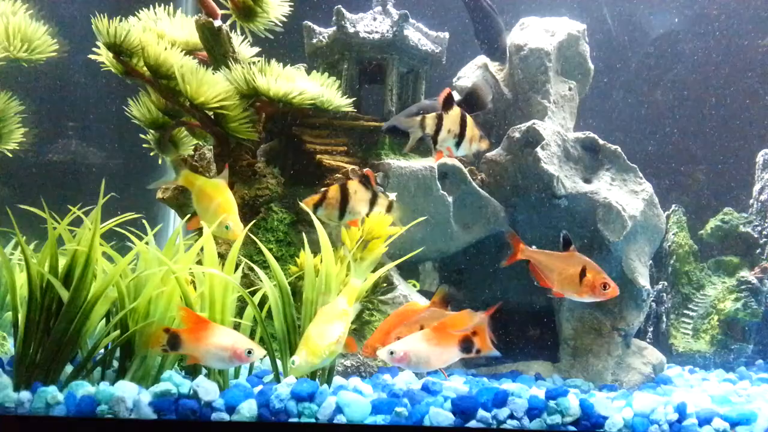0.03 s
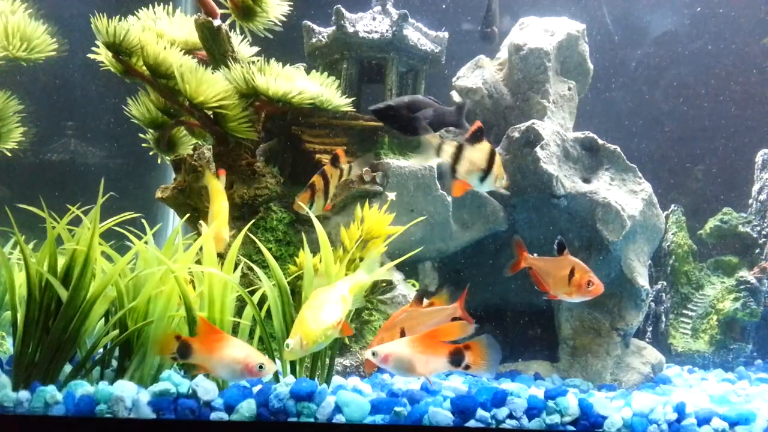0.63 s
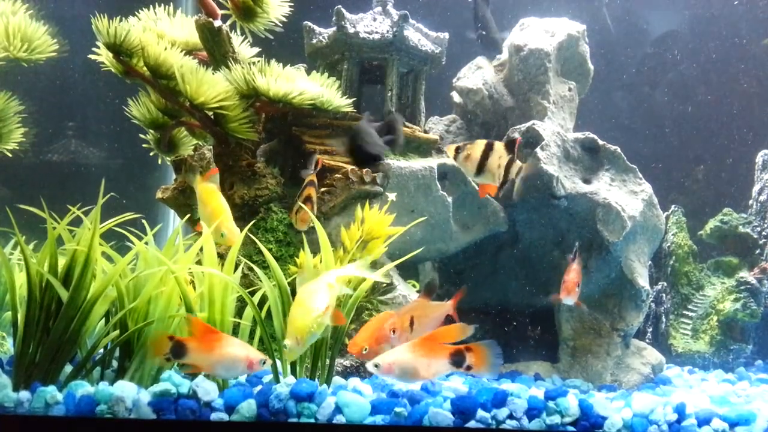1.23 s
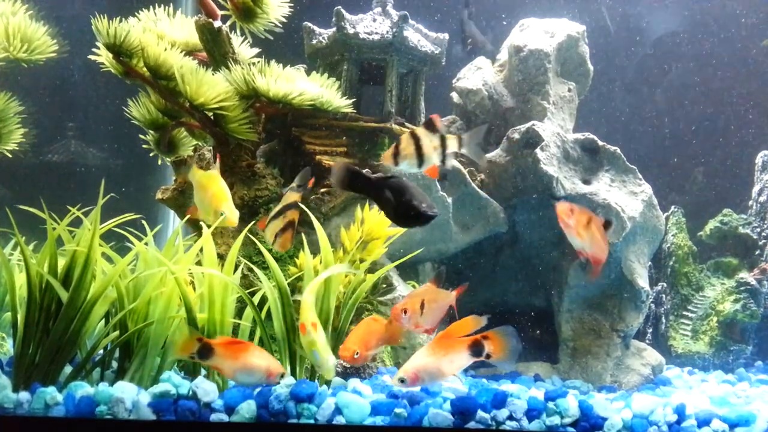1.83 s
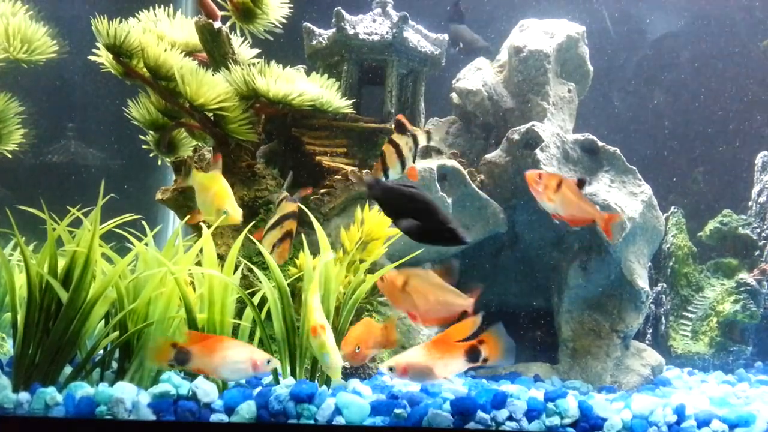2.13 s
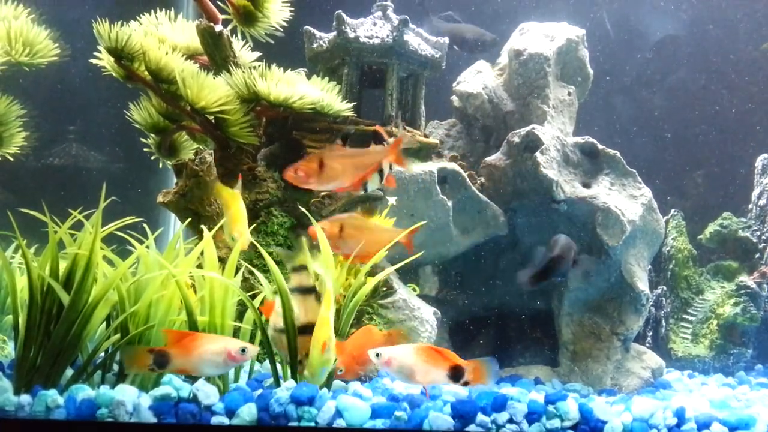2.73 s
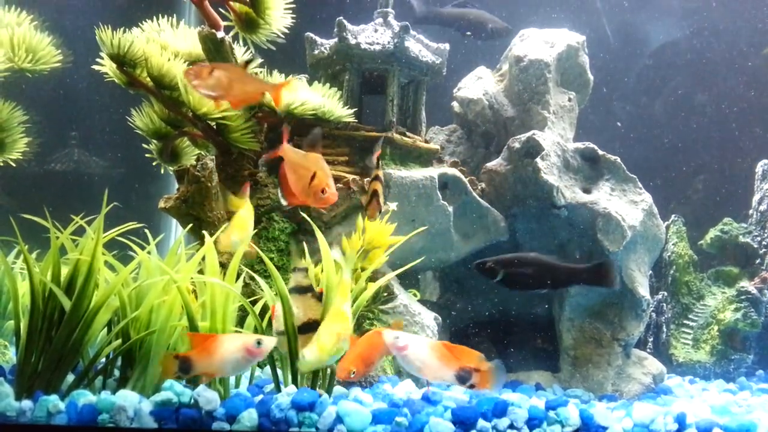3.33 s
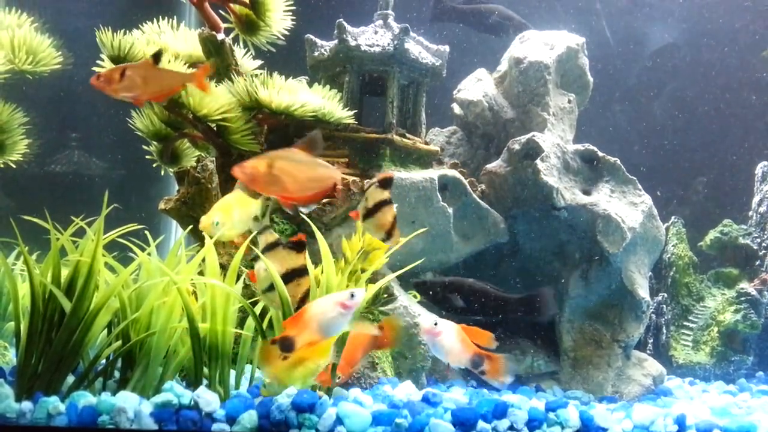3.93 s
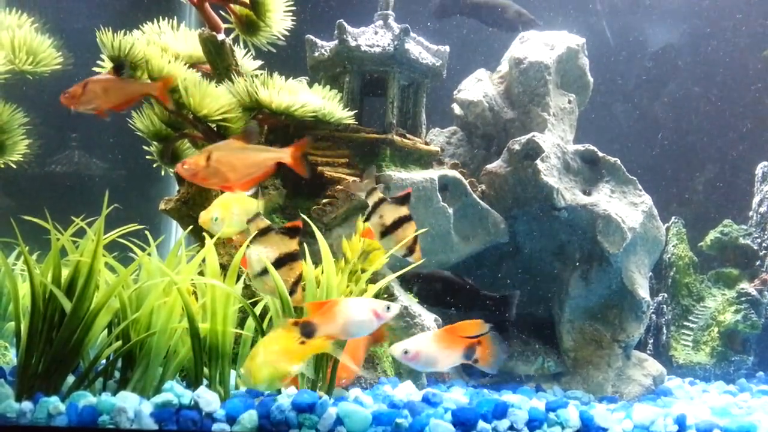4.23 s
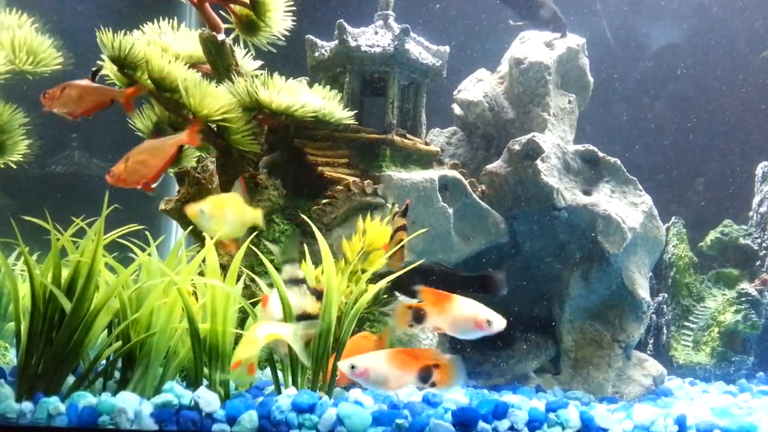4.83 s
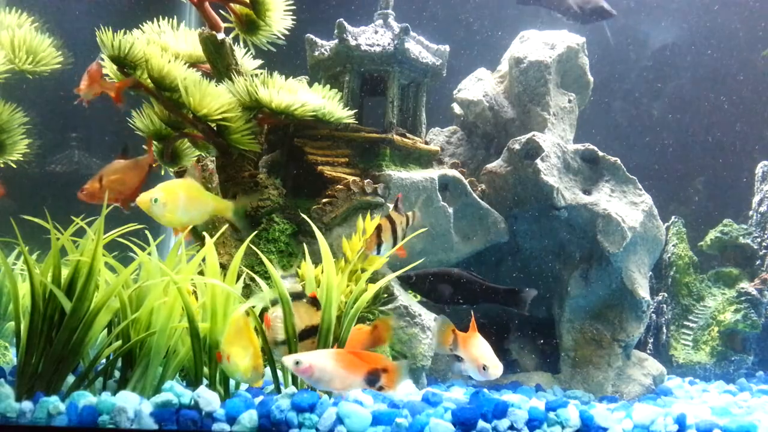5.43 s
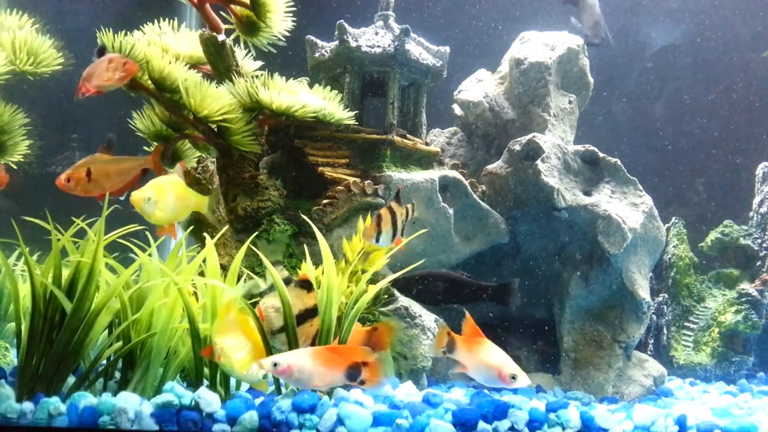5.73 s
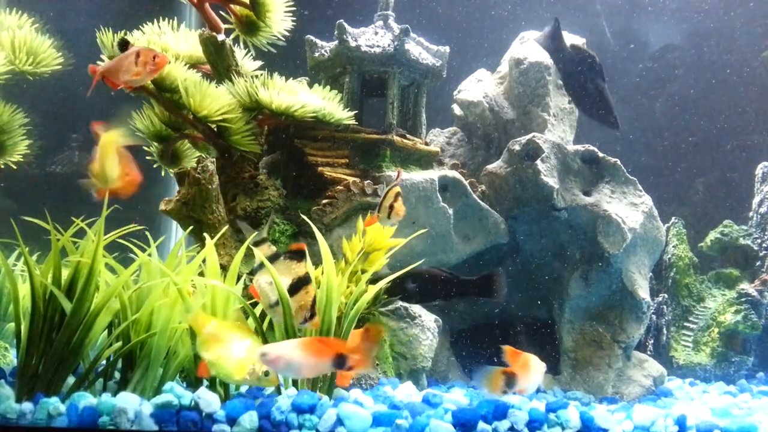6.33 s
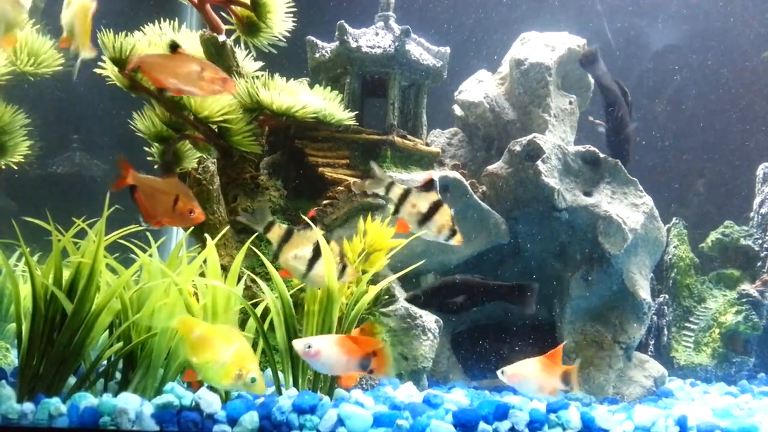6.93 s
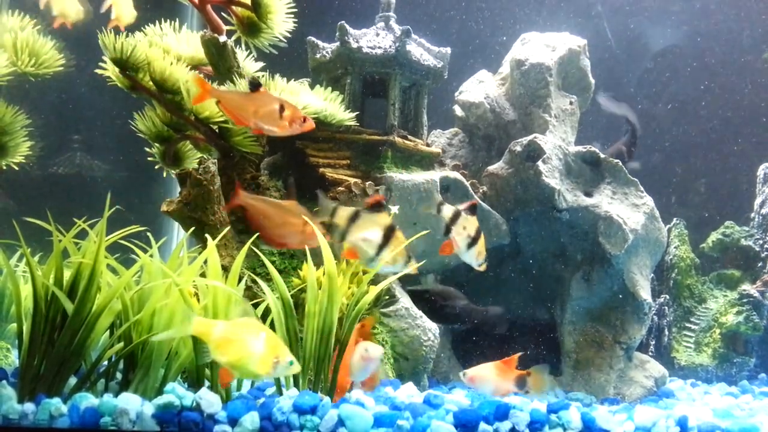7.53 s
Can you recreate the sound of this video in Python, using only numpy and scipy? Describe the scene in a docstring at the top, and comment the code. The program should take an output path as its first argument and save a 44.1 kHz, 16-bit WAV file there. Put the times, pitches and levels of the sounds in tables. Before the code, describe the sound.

Aquarium filter water bubbling and gurgling steadily, with occasional low gulps over a soft pump hum and faint hiss.

```python
"""A gulp of air and gurgling water, after 0.8 s of silence: an aquarium filter in a quiet room.
Large bubbles ring at the outflow, heard from just outside the glass, over froth and a low churn.
Now and then the outflow gulps again and the water column rings. The surface fizzes and splashes
softly; tiny bubbles tick as they burst. The mains-driven pump hums, and a faint hiss lies under it all."""
import sys
import numpy as np
from scipy import signal
from scipy.fft import rfft, irfft, next_fast_len
from scipy.io import wavfile

SR = 44100
rng = np.random.default_rng(int(sys.argv[2]) if len(sys.argv) > 2 else 0)


def unload_wav(signal):
    """Save mono or channel-first audio to the path in sys.argv[1] as 16-bit WAV at rate SR, clipped to [-1, 1]."""
    wavfile.write(
        sys.argv[1],
        SR,
        np.round(np.clip(np.atleast_2d(signal).T, -1, 1) * 32767).astype(np.int16),
    )


N = 338247
LEFT_LEAD_MS = 0.31  # the outflow is nearer the left ear

# left-right likeness of noise and room tail: f/Hz, coherence/1
COHERENCE = [(30, 0.71), (130, 0.97), (300, 0.99), (630, 0.88), (1000, 1), (1400, 0), (15000, 0)]
# room decay: f/Hz, t60/s
ROOM_DECAY = [(100, 0.91), (500, 0.19), (2000, 0.067), (12000, 0.07)]
# hiss spectrum: f/Hz, relative density/dB
HISS_SPECTRUM = [(100, -4.5), (2000, 0.5), (4000, 0), (6200, -5), (8000, -0.75), (10000, 0), (15000, -1)]
# pump hum: mains multiple/1, left rms/dB, right rms/dB, left lead/rad
PUMP_HARMONICS = [(1, -72, -68, 1.2), (2, -55, -55.5, 0.2), (3, -56, -61.5, 0.5), (4, -64.5, -63.5, 0.5),
                  (5, -61.5, -67.5, 1.64), (7, -81, -78, -1.8), (8, -61.5, -65.5, -0.04),
                  (12, -75.5, -83, -0.5), (17, -85, -75, 0.5), (18, -96, -75, 4.5), (19, -67, -68.5, -0.86)]
# hollow resonances of the air under the lid: f/Hz, width/Hz, relative level/dB
LID_MODES = [(85, 7.7, -4), (931, 17.4, 4)]
# outflow strength: t/s, level/dB
FLOW_CURVE = [(.82, 1), (1.25, -5), (1.6, 1.5), (2.6, 0), (3.1, 1), (3.55, -2), (4.35, 0), (4.7, 3),
              (5.25, -3), (5.9, 2), (6.5, 0.5), (6.87, 1), (7.2, 0.5), (7.66, -2)]
# surface fizz spectrum: f/Hz, relative density/dB
FIZZ_SPECTRUM = [(300, -5.5), (800, 1), (1150, 8.5), (1450, -1), (2200, -2.5), (3800, -6.5), (6000, -12),
                 (15000, -39)]
# soft surface splashes: t/s, length/s, level/dB
SURFACE_SPLASHES = [(.81, 0.055, -56), (2.72, .15, -64), (4.57, 0.19, -62), (4.83, 0.12, -59),
                    (5.48, 0.11, -61), (6.86, 0.093, -58.5)]
# tiny bubbles bursting: t/s, level/dB, f/Hz
SURFACE_TICKS = [(.874, -55, 6940), (1.562, -54, 13100), (1.742, -57, 8800), (2.388, -50.5, 2120),
                 (2.552, -56.5, 4070), (3.217, -57, 7150), (3.937, -58, 5770), (3.971, -58.5, 4070),
                 (4.593, -51, 3550), (4.746, -55, 9400), (5.102, -57, 3960), (5.106, -58, 7550),
                 (5.309, -55.5, 10300), (5.502, -55, 2500), (6.148, -57, 2160), (7.009, -58, 2600)]
# churning water spectrum: f/Hz, relative density/dB
CHURN_SPECTRUM = [(25, -52), (55, -41), (75, -31), (100, -17), (125, -3), (170, 0), (215, -11.5), (285, -6),
                  (355, -11.5), (470, -15), (670, -21.5), (770, -19.5), (1500, -34.5), (5000, -61)]
# froth spectrum: f/Hz, relative density/dB
FROTH_SPECTRUM = [(40, -60), (150, -22), (340, -20.5), (400, 2), (480, 0), (550, -2.5), (610, -11),
                  (680, -2.5), (770, -20), (1500, -26.5), (5000, -54)]
# spurts of small bubbles: t/s, length/s, level/dB
FROTH_SPURTS = [(.865, 0.066, -50), (1.335, 0.078, -45.5), (1.9, 0.1, -53.5), (2.28, 0.037, -41.5),
                (2.98, 0.049, -55), (3.425, 0.062, -48.5), (4.4, 0.045, -51), (4.485, 0.096, -47),
                (4.565, 0.13, -46), (5.37, 0.049, -45.5), (6.05, 0.1, -45), (7.61, 0.1, -51)]
# air gulps: t/s, level/dB, then the pocket's level/dB, f/Hz, length/s, rise/(octaves per s)
AIR_GULPS = [(.82, -44.5, -51, 285.6, 0.069, 2.1), (2.86, -37, -42, 282.5, 0.092, 0.6),
             (4.055, -38, -39.5, 333, 0.026, 4.7), (4.524, -44, -36, 236.7, 0.062, 28)]
# water column resonances: f/Hz, level re gulp/dB, t60/s
COLUMN_MODES = [(153.6, -4.5, 0.37), (173.3, -1.5, 0.27)]
# large bubbles at the outflow: t/s, level/dB, f/Hz, t60/s
LARGE_BUBBLES = [(.846, -31, 475, 0.063), (.939, -30, 506, 0.077), (1.143, -29, 477.6, 0.1),
                 (1.459, -30.5, 492, 0.16), (1.516, -32.5, 406, .2), (1.598, -25.5, 415, 0.056),
                 (1.707, -27, 473, 0.053), (1.861, -27.5, 478, 0.15), (2.016, -28.5, 498, 0.074),
                 (2.031, -34.5, 476, 0.17), (2.083, -23, 438, 0.061), (2.228, -29.5, 517, 0.18),
                 (2.29, -34, 640, 0.057), (2.396, -42, 422, 0.29), (2.509, -26.5, 478.6, 0.12),
                 (2.571, -28.5, 442, 0.071), (2.687, -35, 424, 0.12), (2.811, -27, 536, 0.041),
                 (3.188, -36.5, 496, 0.18), (3.504, -37, 432, 0.15), (3.522, -40.5, 716, .12),
                 (3.892, -30, 475, 0.058), (3.959, -32.5, 513, 0.082), (4.679, -27, 480, 0.045),
                 (4.833, -33.5, 478, 0.31), (5.016, -34.5, 468, 0.16), (5.079, -29.5, 433, 0.067),
                 (5.206, -31, 487, 0.065), (5.25, -35, 436, 0.15), (5.424, -30, 416, 0.13),
                 (5.497, -26.5, 496, 0.041), (5.518, -29, 403, 0.12), (5.553, -24.5, 495, 0.066),
                 (5.663, -25, 472, 0.043), (5.707, -30.5, 472, 0.077), (5.753, -26.5, 440, 0.065),
                 (5.785, -36.5, 512.5, 0.33), (5.832, -25, 420, 0.041), (5.892, -25, 476, 0.1),
                 (5.903, -33, 386, 0.14), (5.99, -28.5, 496, 0.15), (6.013, -30.5, 468, 0.19),
                 (6.043, -37, 472, 0.45), (6.253, -26.5, 452, 0.095), (6.276, -30.5, 422.5, 0.12),
                 (6.406, -35, 558, 0.087), (6.45, -32, 496, .2), (6.539, -35.5, 459, 0.25),
                 (6.692, -24.5, 417, 0.086), (6.768, -33, 539, 0.11), (6.825, -28.5, 486, 0.24),
                 (6.91, -29, 404, .065), (7.015, -33, 434, 0.13), (7.093, -32, 515, 0.056),
                 (7.15, -27.5, 469, 0.14), (7.206, -33, 483, 0.14), (7.262, -23.5, 430, 0.11),
                 (7.304, -31.5, 514, 0.096), (7.319, -27.5, 447, 0.14), (7.387, -29.5, 412, 0.078),
                 (7.428, -30, 474, 0.081), (7.52, -31.5, 515, 0.048), (7.571, -29.5, 478, 0.095)]


def gain(db):
    """Decibels to amplitude."""
    return 10 ** (np.asarray(db) / 20)


def unit_rms(x):
    """Scales to rms 1."""
    return x / np.sqrt(np.mean(x ** 2) + 1e-20)


def at_hz(table, hz):
    """Interpolates on a log-frequency axis."""
    table_hz, value = np.transpose(table)
    return np.interp(np.log(hz + 1), np.log(table_hz + 1), value)


def add(mix, start_s, sound):
    """Mixes a sound in at start_s."""
    part = mix[max(round(start_s * SR), 0):][:len(sound)]
    part += sound[:len(part)]


def drift(max_hz):
    """Slow random wander, rms 1."""
    t = np.arange(0, N, 128) / SR
    hz = max_hz * np.geomspace(0.1, 1, 20)
    wander = np.sin(2 * np.pi * (hz * t[:, None] + rng.random(len(hz)))).sum(1)
    return np.interp(np.arange(N) / SR, t, unit_rms(wander))


def flow_gain():
    """Outflow strength per sample."""
    return gain(np.interp(np.arange(N) / SR, *np.transpose(FLOW_CURVE)))


def swells(rows):
    """Envelope of fast-rising, slower-dying swells, summed in power."""
    power, t = np.zeros(N), np.arange(SR) / SR
    for start_s, length_s, db in rows:
        age = np.pi * t / length_s
        add(power, start_s, (gain(db) * age * np.exp(1 - age)) ** 2)
    return np.sqrt(power)


def noise(spectrum_db, lead_ms=LEFT_LEAD_MS):
    """Coloured stereo noise, rms 1: sides alike in the bass, unrelated in the treble."""
    size = next_fast_len(N)
    hz = np.fft.rfftfreq(size, 1 / SR)
    left, other = rfft(rng.standard_normal((2, size)))
    coherence = at_hz(COHERENCE, hz)
    delay = np.exp(-2j * np.pi * hz * lead_ms / 1000)
    right = (coherence * left + np.sqrt(1 - coherence ** 2) * other) * delay
    return unit_rms(irfft(np.array([left, right]) * gain(spectrum_db(hz)), size)[:, :N])


def bubble(db, hz, t60_s, glide_per_s, rise_s):
    """Air ringing in water: a dying sine, its pitch rising as it nears the surface."""
    t = np.arange(SR // 4) / SR
    envelope = (1 - np.exp(-t / rise_s)) * gain(-60 * t / t60_s)
    return gain(db) * envelope * np.sin(2 * np.pi * hz * (t + glide_per_s * t ** 2 / 2))


def room(x, wet_db):
    """Adds a short tail of sparse reflections and places the source slightly left."""
    taps = np.zeros((2, SR // 2))
    slots = np.arange(SR // 200, SR // 2 - 20, 20)
    arrivals = slots + rng.integers(0, 20, (2, len(slots)))
    np.put_along_axis(taps, arrivals, rng.choice([-1., 1.], arrivals.shape), 1)
    hz, t, spectra = signal.stft(taps, SR, nperseg=256)
    coherence = at_hz(COHERENCE, hz)[:, None]
    spectra[1] = coherence * spectra[0] + np.sqrt(1 - coherence ** 2) * spectra[1]
    decay = gain(-60 * t / at_hz(ROOM_DECAY, hz)[:, None])
    tail = signal.istft(spectra * decay, SR, nperseg=256)[1]
    wet = signal.fftconvolve(x[None], tail / np.linalg.norm(tail[0]), axes=1)[:, :N]
    left, right = x + gain(wet_db) * wet
    n = np.arange(N)
    return np.array([left, np.interp(n - LEFT_LEAD_MS * SR / 1000, n, right)])


def hiss(rms_db=-60):
    """Faint, even hiss."""
    return gain(rms_db) * noise(lambda hz: at_hz(HISS_SPECTRUM, hz), lead_ms=0)


def pump(mains_hz=60, whine_hz=10202, waver_db=1.2):
    """Mains harmonics wavering with the load, plus a thin electrical whine."""
    t = np.arange(N) / SR
    cycles = mains_hz * t + 0.0059 * drift(1.475)
    hum = np.zeros((2, N))
    for multiple, left_db, right_db, lead_rad in PUMP_HARMONICS:
        phase = 2 * np.pi * (multiple * cycles + rng.random())
        level = gain(waver_db * drift(2.9)) * gain([[left_db], [right_db]])
        hum += level * np.sin([phase, phase - lead_rad])
    whine = gain([[-95], [-86]]) * np.sin(2 * np.pi * whine_hz * t)
    return np.sqrt(2) * (hum + whine)


def lid_ring(rms_db=-66):
    """The water stirs the air under the lid into a steady hollow ring."""
    def spectrum_db(hz):
        power = sum(gain(db) ** 2 / width_hz / (1 + ((hz - mode_hz) / width_hz) ** 2) ** 2
                    for mode_hz, width_hz, db in LID_MODES)
        return 10 * np.log10(power)
    return gain(rms_db) * noise(spectrum_db)


def fizz(base_db=-61.5, flow_exponent=0.39):
    """The surface fizzes with the flow and swells at each splash."""
    bed = gain(base_db) * flow_gain() ** flow_exponent
    return noise(lambda hz: at_hz(FIZZ_SPECTRUM, hz)) * np.hypot(bed, swells(SURFACE_SPLASHES))


def ticks(faint_count=40, ring_cycles=100, snap_t60_s=0.028):
    """Tiny bubbles burst: a brief high ring and a noisy snap around the same pitch."""
    out, t = np.zeros(N), np.arange(SR // 4) / SR
    faint = [(when * N / SR, -71 + 7 * strength, 1300 * 8 ** pitch)
             for when, strength, pitch in rng.random((faint_count, 3))]
    for start_s, db, hz in list(SURFACE_TICKS) + faint:
        band = signal.butter(2, [hz * 0.9, min(hz * 1.12, SR / 2.2)], "bandpass", fs=SR)
        snap = unit_rms(signal.lfilter(*band, rng.standard_normal(len(t))))
        snap *= gain(db - 2 - 60 * t / snap_t60_s)
        ring = bubble(db, hz, ring_cycles / hz, glide_per_s=0.73, rise_s=0.00032)
        add(out, start_s, ring + snap)
    return room(out, wet_db=6)


def churn(base_db=-52, waver_db=0.81, surge_s=0.1, surge_re_gulp_db=-10.5):
    """Water churns low with the flow; each gulp stirs it briefly."""
    rumble = noise(lambda hz: at_hz(CHURN_SPECTRUM, hz), lead_ms=0.17)
    bed = gain(base_db + waver_db * drift(14)) * flow_gain()
    surges = swells((start_s, surge_s, db + surge_re_gulp_db) for start_s, db, *_ in AIR_GULPS)
    return rumble * np.hypot(bed, surges)


def froth(base_db=-56.5, waver_db=1.05, flow_exponent=2.3, puff_s=0.068):
    """Small bubbles follow the flow and come in spurts; each large bubble drags a puff of them."""
    wash = noise(lambda hz: at_hz(FROTH_SPECTRUM, hz))
    bed = gain(base_db + waver_db * drift(11)) * flow_gain() ** flow_exponent
    puffs = [(start_s, puff_s, -39 + 0.41 * db) for start_s, db, *_ in LARGE_BUBBLES]
    return wash * np.hypot(bed, swells(puffs + list(FROTH_SPURTS)))


def gulps(pocket_lag_s=0.028):
    """The outflow gulps air: the water column rings low, then a big pocket breaks off, rising in pitch."""
    out = np.zeros(N)
    for start_s, gulp_db, pocket_db, pocket_hz, length_s, octaves_per_s in AIR_GULPS:
        for hz, mode_db, t60_s in COLUMN_MODES:
            add(out, start_s, bubble(gulp_db + mode_db, hz, t60_s, glide_per_s=0.67, rise_s=0.0096))
        t = np.arange(0, length_s, 1 / SR)
        cycles = np.cumsum(pocket_hz * 2 ** (octaves_per_s * t)) / SR
        envelope = gain(pocket_db) * np.sin(np.pi * t / length_s)
        add(out, start_s + pocket_lag_s, envelope * np.sin(2 * np.pi * cycles))
    return room(out, wet_db=-11)


def gurgle(weak_count=110):
    """Large bubbles break from the outflow, among weaker ones whose level follows the flow."""
    large, weak = np.zeros((2, N))
    for start_s, db, hz, t60_s in LARGE_BUBBLES:
        add(large, start_s, bubble(db, hz, t60_s, glide_per_s=0.77, rise_s=0.0035))
    for when, strength, pitch, glide in rng.random((weak_count, 4)):
        db, hz = -50 + 8 * strength, 375 + 240 * pitch
        add(weak, when * N / SR, bubble(db, hz, t60_s=0.14, glide_per_s=4 * glide, rise_s=0.0011))
    return room(large + weak * flow_gain() ** 2, wet_db=-12)


def scene():
    """Pump, bubbles and moving water over the hiss."""
    return pump() + gurgle() + gulps() + ticks() + churn() + froth() + lid_ring() + fizz() + hiss()


def record(dry):
    """Silence, then the sound cuts in; a steep low-pass ends the treble."""
    start_s, fade_s, cutoff_hz = 0.814, 0.003, 14650
    gate = np.clip((np.arange(N) / SR - start_s) / fade_s, 0, 1)
    lowpass = signal.firwin(511, cutoff_hz, window=("kaiser", 9), fs=SR)
    return signal.oaconvolve(dry * gate, lowpass[None], "same")


dry = scene()
out = record(dry)
unload_wav(out)
```